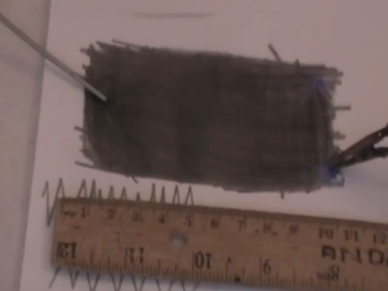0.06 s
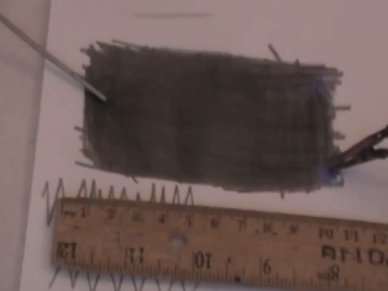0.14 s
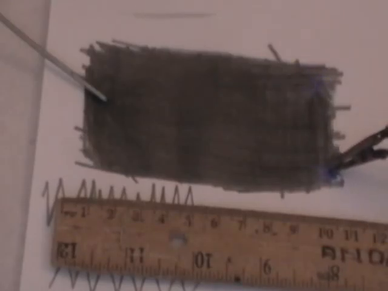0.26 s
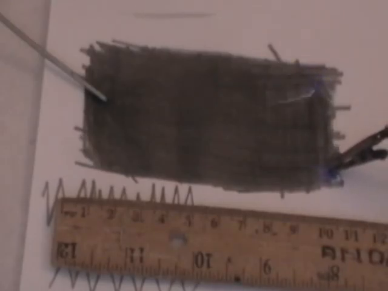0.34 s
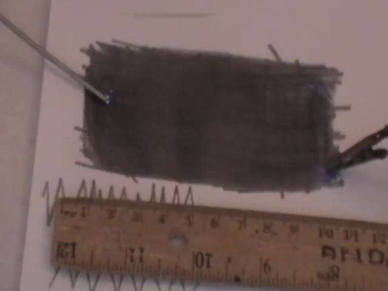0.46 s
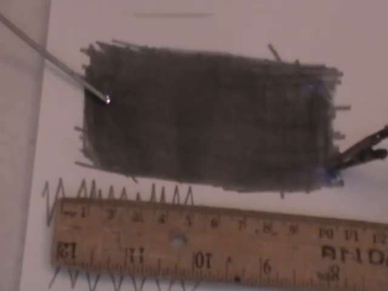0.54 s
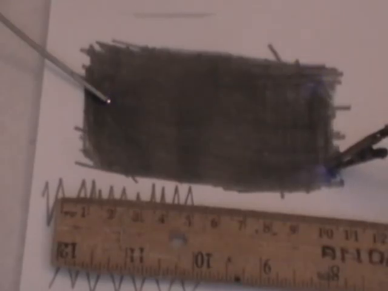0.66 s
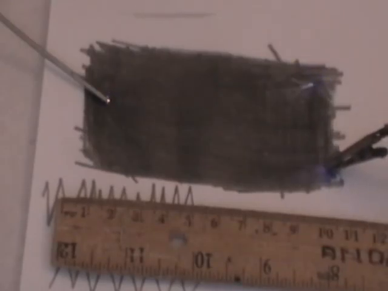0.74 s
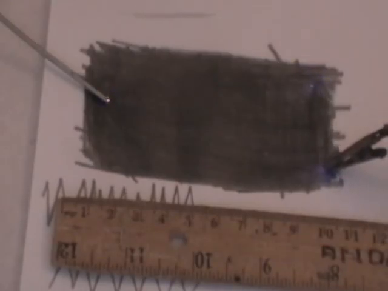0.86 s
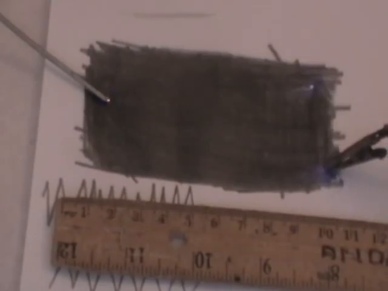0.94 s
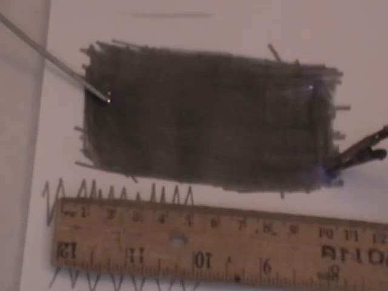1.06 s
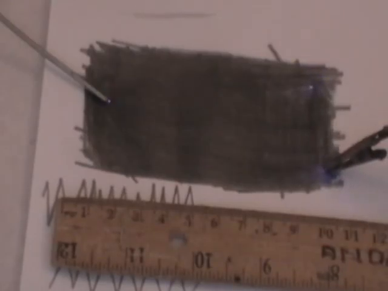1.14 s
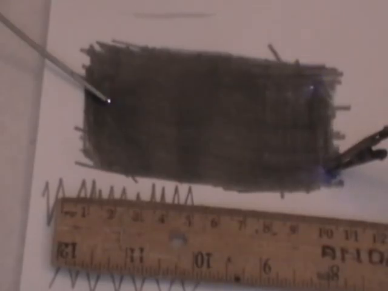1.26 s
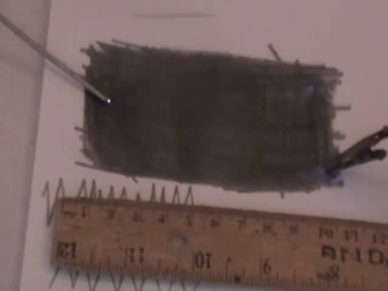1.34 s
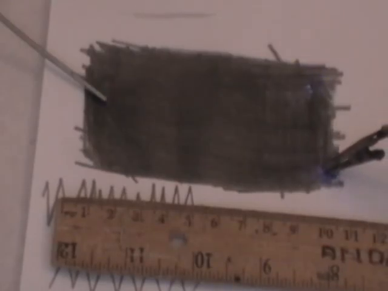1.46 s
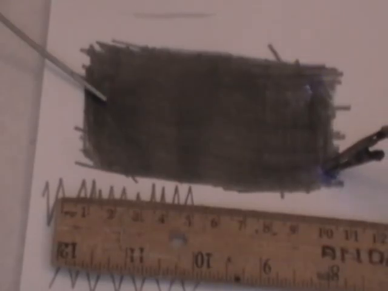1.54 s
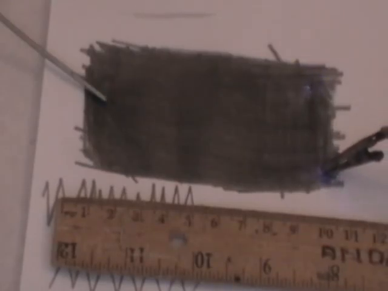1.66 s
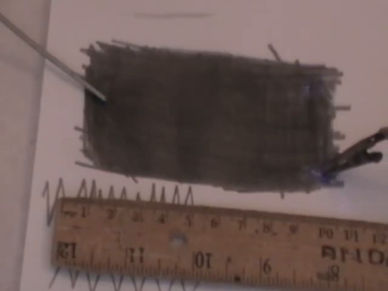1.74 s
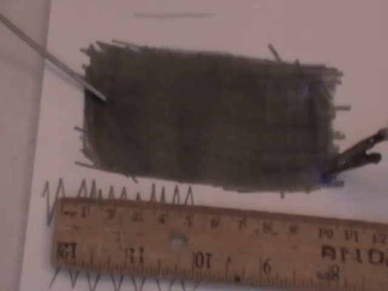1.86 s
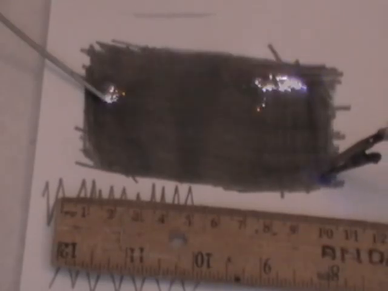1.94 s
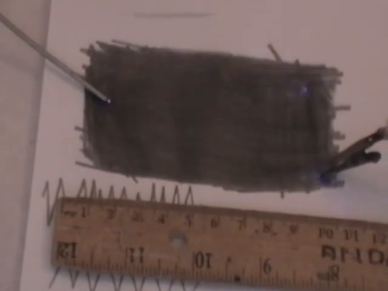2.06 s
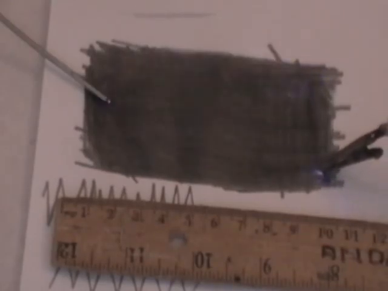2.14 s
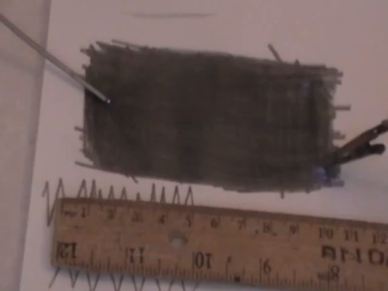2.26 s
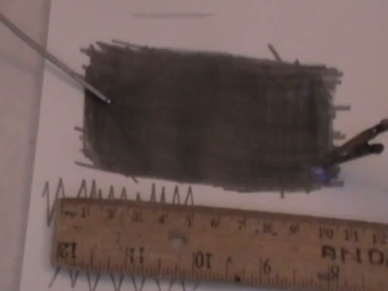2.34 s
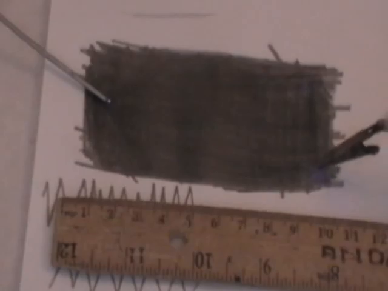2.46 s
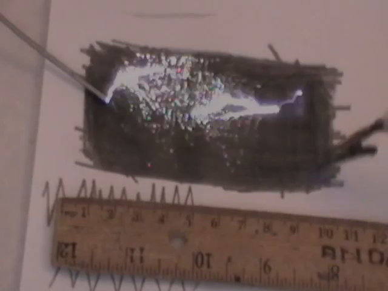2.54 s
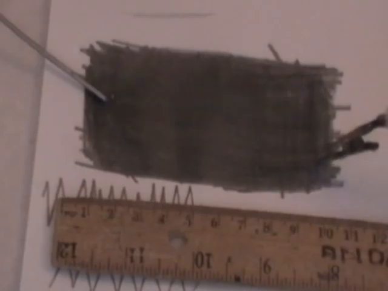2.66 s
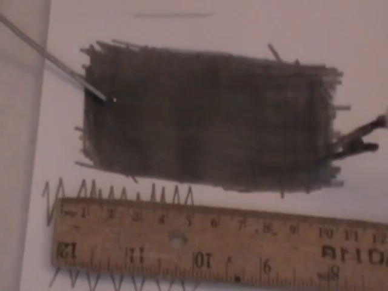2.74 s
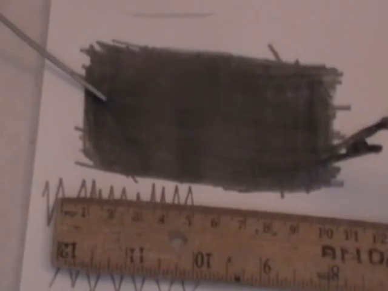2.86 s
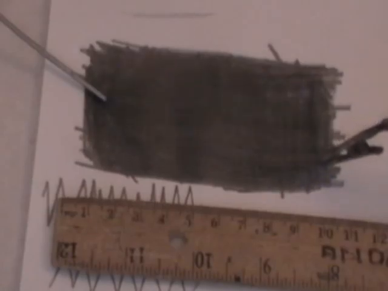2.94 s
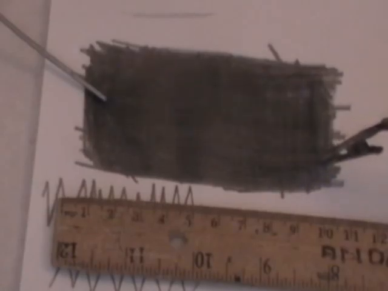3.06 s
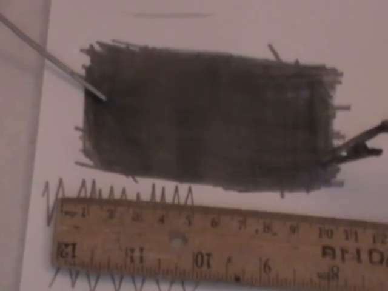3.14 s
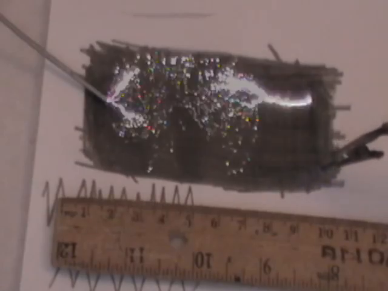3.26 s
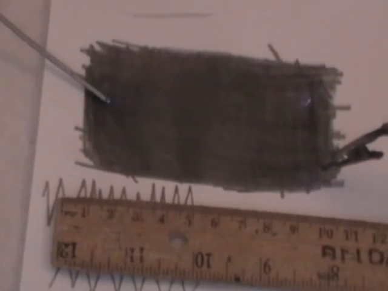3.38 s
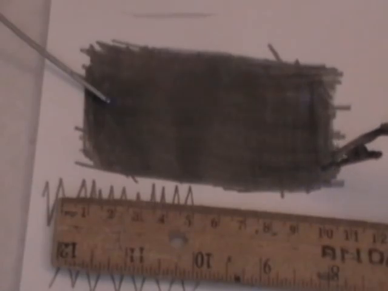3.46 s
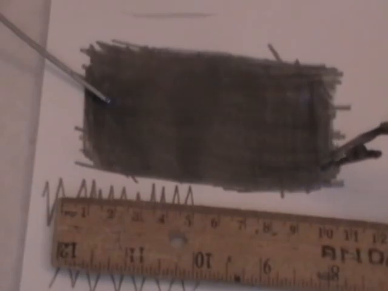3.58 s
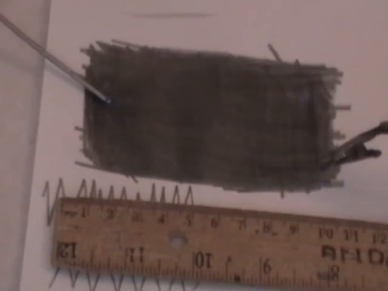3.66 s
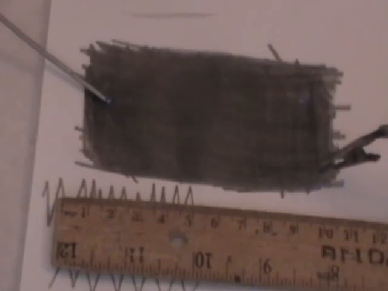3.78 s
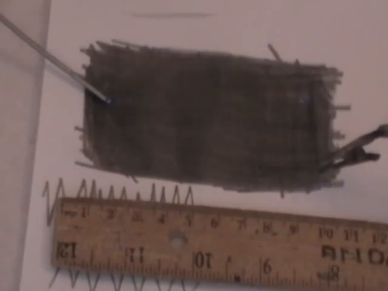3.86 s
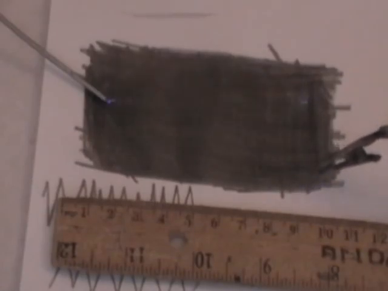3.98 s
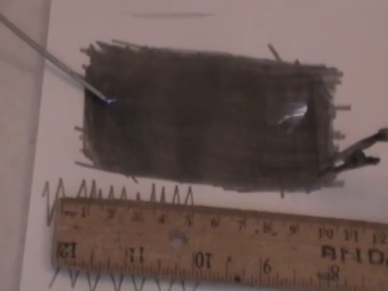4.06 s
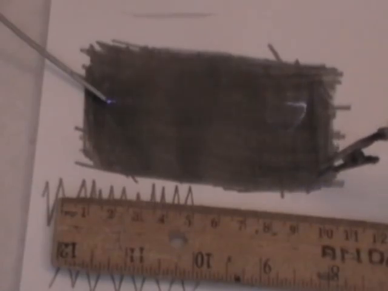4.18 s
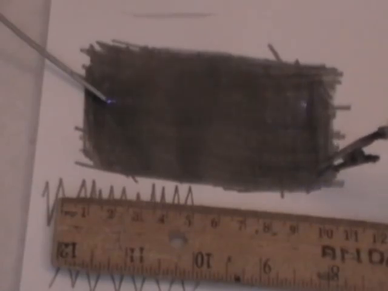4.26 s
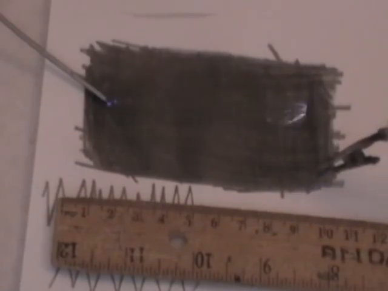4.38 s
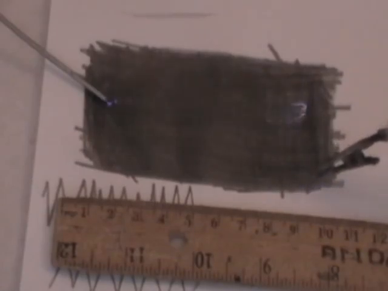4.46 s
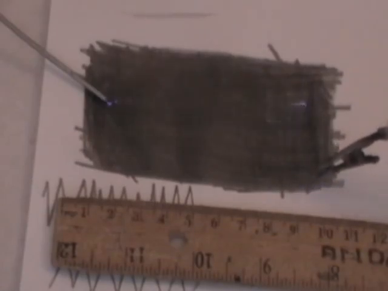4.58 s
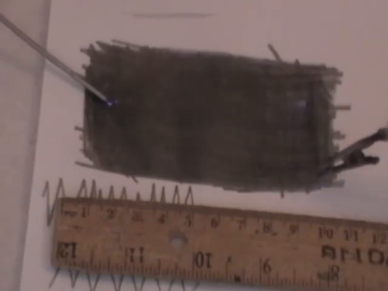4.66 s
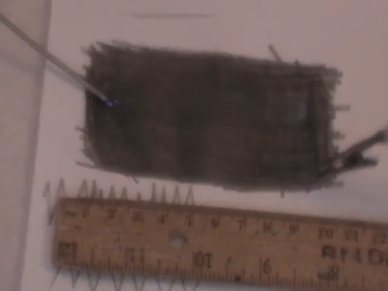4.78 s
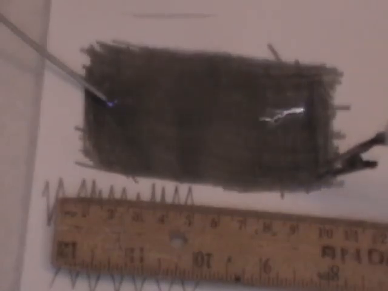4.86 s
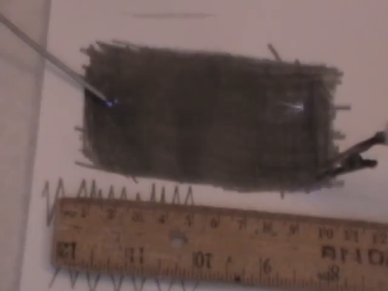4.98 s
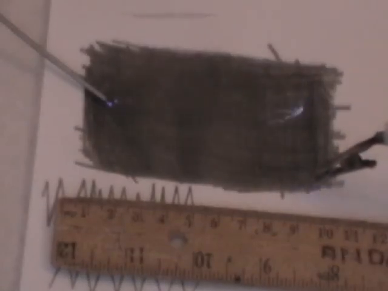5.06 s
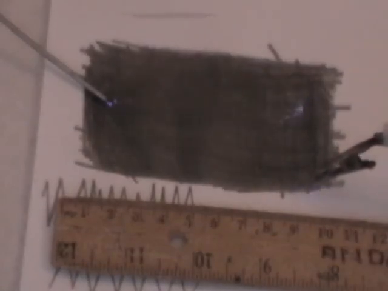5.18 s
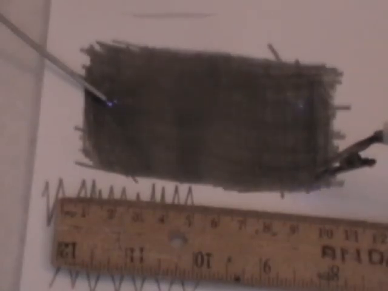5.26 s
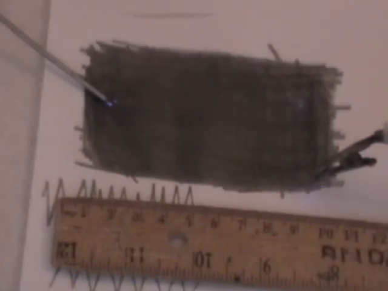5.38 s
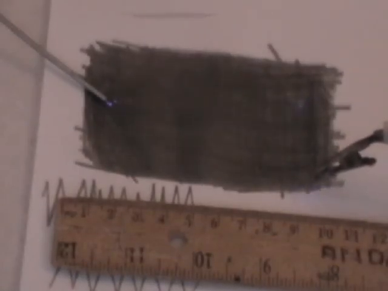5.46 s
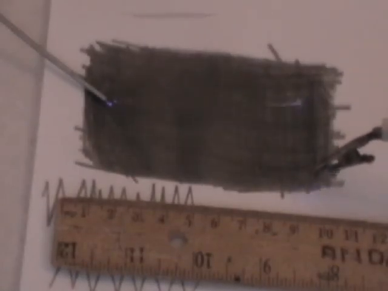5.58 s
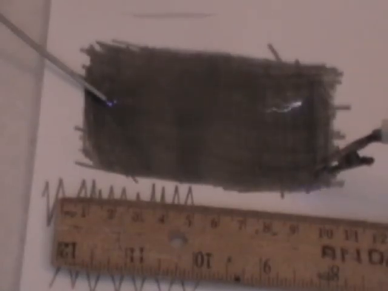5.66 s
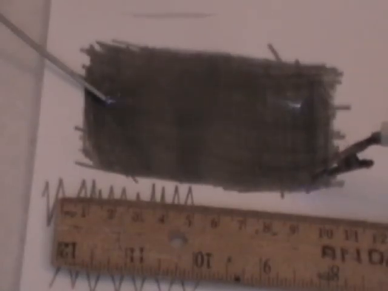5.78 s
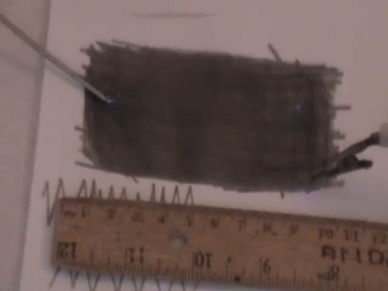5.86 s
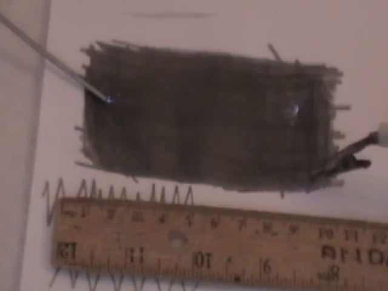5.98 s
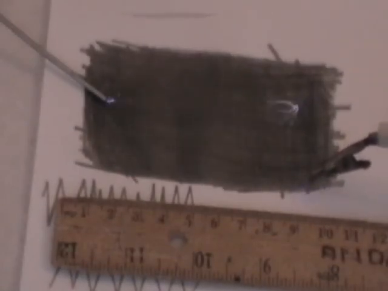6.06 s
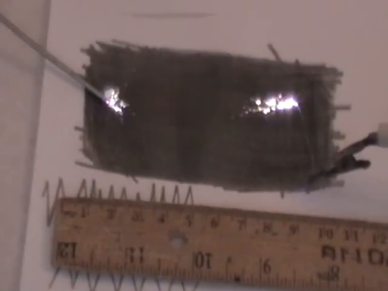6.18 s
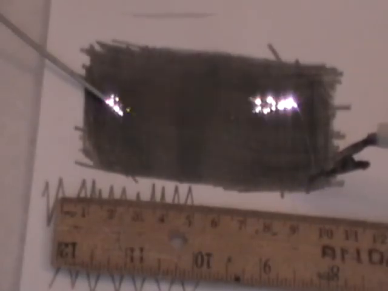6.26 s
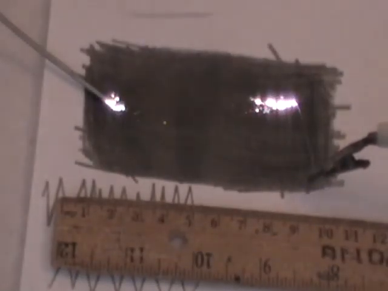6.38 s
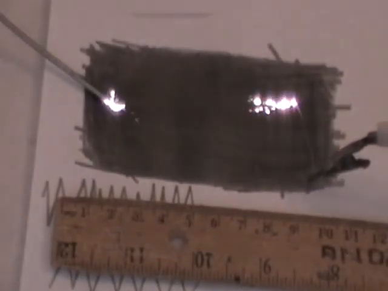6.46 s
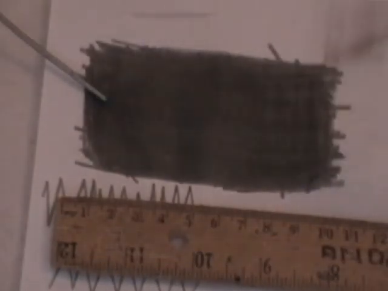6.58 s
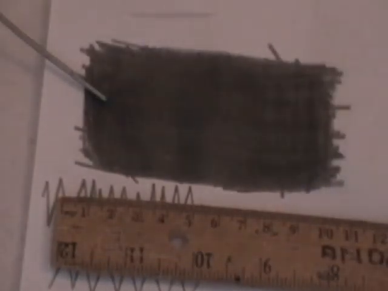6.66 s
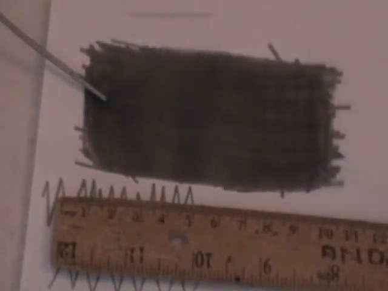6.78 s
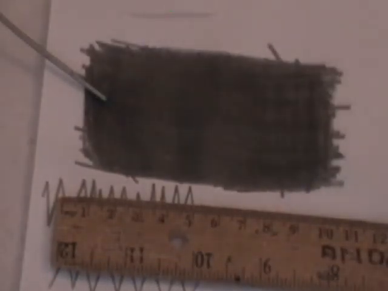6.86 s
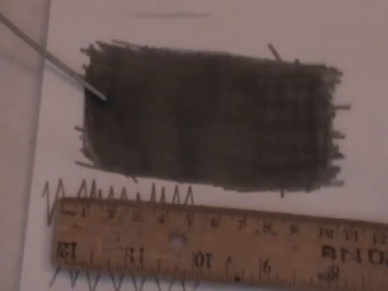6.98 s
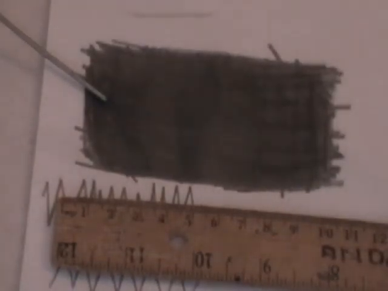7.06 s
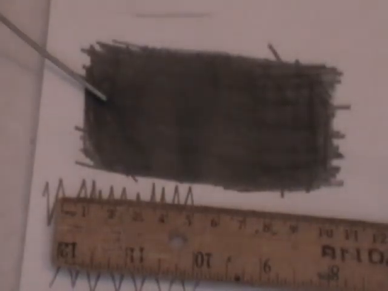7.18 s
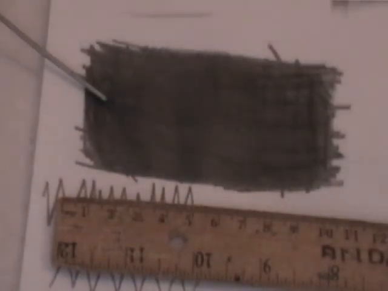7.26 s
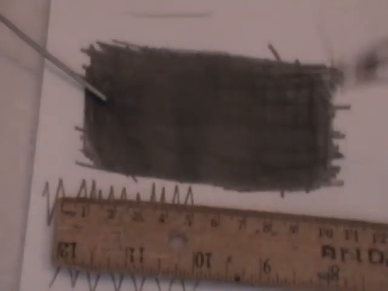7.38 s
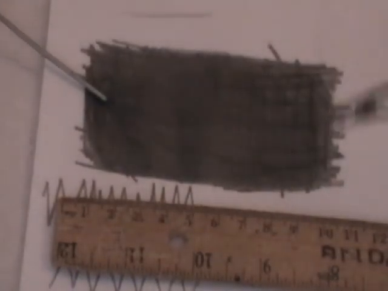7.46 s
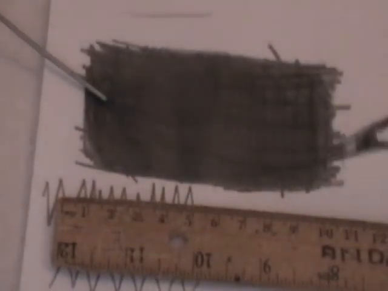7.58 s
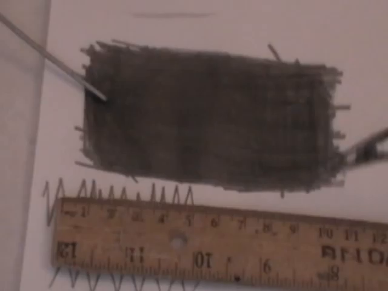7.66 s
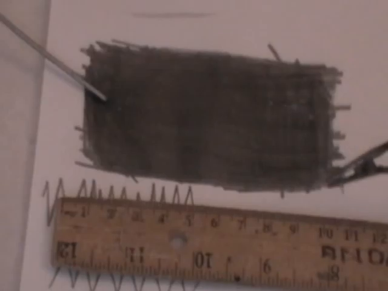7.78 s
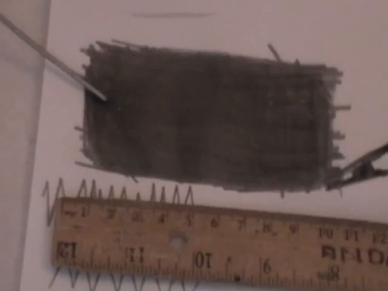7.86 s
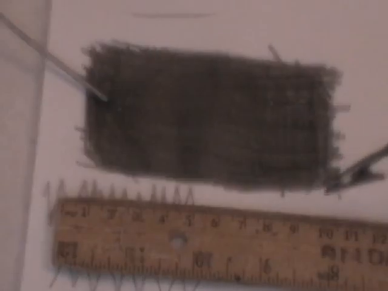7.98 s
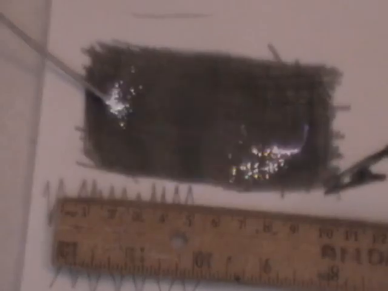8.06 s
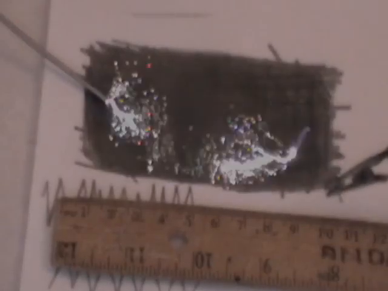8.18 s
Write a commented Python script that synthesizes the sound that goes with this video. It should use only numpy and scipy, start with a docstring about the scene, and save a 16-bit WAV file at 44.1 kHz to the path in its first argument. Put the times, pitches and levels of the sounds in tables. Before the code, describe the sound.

A harsh high electrical hiss sizzles and wavers close up, broken by five loud sharp spark snaps, over a faint transformer hum.

```python
"""In a small hard room, a high-voltage discharge creeps over a pencilled patch of paper near the microphone.
Corona is heard as shaped noise that flares and chokes, with faint whistles of narrow-band noise on top.
Now and then a spark jumps: a noise crack with echoes, a push of air and a decaying ring of the room, loud
enough to overload the microphone. Crackles and light desk taps are heard too. Underneath lie a
transformer hum of steady sines and a background of coloured noise."""
import sys
import numpy as np
from scipy import signal
from scipy.io import wavfile
from scipy.ndimage import uniform_filter1d

SR = 44100
rng = np.random.default_rng(int(sys.argv[2]) if len(sys.argv) > 2 else 0)


def voltage_ratio(decibels):
    """Convert decibels (scalar or array-like) to amplitude ratios, 20 dB per decade."""
    exponent = np.asarray(decibels, float) / 20
    return 10 ** exponent


def unload_wav(signal):
    """Save mono or channel-first audio to the path in sys.argv[1] as 16-bit WAV at rate SR, clipped to [-1, 1]."""
    wavfile.write(
        sys.argv[1],
        SR,
        np.round(np.clip(np.atleast_2d(signal).T, -1, 1) * 32767).astype(np.int16),
    )


N = 362502  # length in samples

# Strength of the discharge as the electrode moves. Each row: time in seconds, corona hiss in dB,
# fizz of sparks tracking over the graphite in dB re corona, top sizzle in dB re corona.
DISCHARGE = [(0, -35, -13.5, -11), (.33, -39, -11.5, -7.5), (.505, -39, -10.5, -9), (.53, -43.5, -10, -6),
             (.62, -39, -10, -6), (.95, -36, -12.5, -8.5), (1.3, -38.5, -10.5, -6.5),
             (1.57, -35.5, -14.5, -7.5), (2.02, -40.5, -8, -6.5), (2.25, -38.5, -9.5, -8.5),
             (2.65, -36, -5.5, -11.5), (2.85, -35, -7, -12.5), (3.38, -33.5, -9, -12.5),
             (3.55, -38, -8.5, -12), (3.85, -40.5, -6, -13), (4.45, -41, -7.5, -8),
             (4.46, -35.5, -10.5, -10), (4.75, -35, -9.5, -16), (4.95, -33, -11, -16),
             (5.3, -32, -10.5, -17), (5.58, -32.5, -10.5, -18), (5.81, -34, -7, -15), (5.86, -35.5, -9, -9),
             (6.05, -36.5, -10, -12.5), (6.26, -35, -9, -12), (6.5, -54, 1, -18), (6.64, -61, -9, -18),
             (6.7, -56.5, -11, -5), (7.05, -56, -8, -9), (7.6, -53, -10, -8.5), (7.8, -45.5, -11, -11),
             (7.92, -44, -6.5, -7), (8.15, -38, -4, -7.5)]
# Spectra of the three parts of the hiss. Each row: frequency in Hz, relative density in dB per Hz.
CORONA_SPECTRUM = [(3000, -48.5), (5500, -17), (6500, -4.5), (7500, -0.5), (8800, -2), (9600, -5.5),
                   (10500, -6.5), (11500, -17.5), (14000, -39)]
TRACKING_SPECTRUM = [(500, -38), (1000, -13), (2200, -8), (3000, -7), (3800, 0), (5000, -0.5), (5800, -1),
                     (7500, -9)]
SIZZLE_SPECTRUM = [(9000, -12.5), (11500, 1.5), (12500, -0.5), (14000, -3), (15600, -3.5), (17000, -28)]
# Swells of the corona, or dips where negative. Each row: start in seconds, level change in dB.
FLARES = [(.06, 2.5), (.22, 1), (.74, 0.5), (1.06, 0.5), (1.65, -2), (1.93, 3.5), (2.53, -2.5), (3.61, 2),
          (3.9, 2), (4.0, 2), (4.15, 1.5), (4.3, 0.5), (4.395, 0.5), (4.49, 1), (6.17, 0.5), (6.74, 2.5),
          (7.84, 2.5), (7.905, 4)]
FLARE_RISE_S, FLARE_FALL_S = 0.012, 0.043
# The discharge chokes for a moment and strikes again. Each row: start in seconds, length in seconds,
# loss in dB.
BREAKS = [(3.03, .014, 4), (3.108, .016, 7), (3.145, .014, 5), (3.58, .028, 4), (7.805, .047, 9),
          (7.86, .011, 9), (7.8745, .0045, 8), (7.889, .011, 9), (7.903, .013, 10), (7.974, .005, 6),
          (7.996, .008, 5)]
SPUTTER_DB, SPUTTER_S = 0.45, 0.03
# Single discharges that stand out of the hiss: rate, mean size before capping, decay time.
PRICKS_PER_S, PRICK_DB, PRICK_MS = 18, 1, 0.4

# Streamers that repeat almost evenly and whistle on one pitch. Each row: start in seconds,
# length in seconds, pitch in Hz, resonance width in Hz, level in dB before flutter and waver.
HELD_WHISTLES = [(0.042, .14, 10400, 900, -44), (.9, .1, 10300, 900, -39), (1.22, 0.32, 1220, 30, -61.5),
                 (2.4, .13, 3940, 500, -52), (3.14, 0.19, 3200, 300, -50), (4.435, 0.13, 5750, 1500, -44),
                 (6.654, 0.1, 6200, 1100, -54), (.82, .1, 12000, 1000, -47)]
HELD_FADE_S, HELD_WAVER_DB = 0.037, 0.5
# Streamers whose pitch moves as the gap changes. Each row: resonance width in Hz, then a list of points:
# time in seconds, pitch in Hz, level in dB before flutter.
WANDERING_WHISTLES = [(1100, [(.17, 15300, -58), (.21, 14600, -46), (.255, 11600, -52), (.31, 11900, -43),
                      (.37, 13800, -58), (.42, 12000, -46), (.47, 11200, -62), (.555, 12500, -49),
                      (.6, 11900, -58), (.67, 12200, -46), (.74, 11800, -62)]), (550, [(2.2, 8740, -52),
                      (2.255, 7200, -35), (2.35, 8150, -47), (2.42, 9400, -38), (2.475, 7700, -41),
                      (2.52, 10100, -39), (2.55, 8600, -36), (2.62, 5500, -50)]), (260, [(2.9, 3400, -62),
                      (3.0, 3610, -47), (3.09, 3600, -49), (3.13, 3500, -56), (3.21, 3750, -48),
                      (3.27, 3600, -60)]), (400, [(4.455, 4530, -51), (4.7, 4500, -57), (5.1, 4550, -48),
                      (5.4, 4540, -49), (5.86, 4420, -54)]), (330, [(4.455, 5090, -50), (4.9, 5030, -52),
                      (5.06, 5020, -42), (5.2, 5050, -48), (5.4, 5090, -45), (5.6, 5040, -50),
                      (5.78, 5050, -45), (5.92, 5000, -62)]), (250, [(6.725, 5900, -70), (6.742, 4600, -58),
                      (6.755, 3300, -58), (6.78, 2200, -74)]), (300, [(6.71, 6900, -62), (6.78, 7750, -55),
                      (7.2, 7750, -55), (7.55, 7650, -56), (7.7, 7450, -60)]), (330, [(7.275, 2100, -68),
                      (7.315, 3200, -62), (7.345, 4100, -56), (7.385, 4800, -60), (7.41, 5000, -74)]),
                      (900, [(7.41, 5100, -70), (7.5, 6000, -57), (7.6, 6600, -57), (7.68, 6900, -66)]),
                      (700, [(7.3, 6500, -72), (7.36, 8850, -63), (7.45, 10200, -63), (7.62, 12500, -66)]),
                      (1000, [(7.47, 5000, -70), (7.58, 4400, -59), (7.68, 3900, -62), (7.75, 3500, -68)])]

# Big sparks. Each row: start in seconds, crack in dB, crack length in ms, low pressure push in dB,
# room tail in dB, dullness from 0 to 1.
SPARKS = [(2.037, 0, 0.64, 3.5, -9.5, 0.1), (2.6626, -2, 3, -33, -13, 0.33),
          (3.4032, 0.5, 1.4, -22.5, -20, 1), (6.267, 4.5, 0.32, 0.5, -9, 0.05),
          (8.1632, 1, 4.8, -6.5, -11, 0.06)]
# Spectrum of a thin fast spark. Each row: frequency in Hz, relative density in dB per Hz.
BRIGHT_SPECTRUM = [(88, -67), (150, -39), (398, -17.5), (1290, -10.5), (1450, -7), (2650, -6), (3700, -2),
                   (4670, -2.5), (8230, 2), (14800, -9), (16000, -33)]
# Spectrum of a fat slow spark. Each row: frequency in Hz, relative density in dB per Hz.
DULL_SPECTRUM = [(100, -40), (200, -27), (400, -14), (800, -8), (1500, -1), (2500, 0), (3800, -4),
                 (6000, -12), (9000, -22), (12000, -33), (16000, -46)]
# Reflections from the nearest surfaces. Each row: delay in ms, level in dB re the direct crack.
ECHOES = [(2.1, -6), (6.7, -5), (9.5, -12)]
# Reverberation time of the room. Each row: frequency in Hz, decay time in seconds.
ROOM_T60 = [(200, 0.17), (500, 0.39), (1500, 0.3), (4000, 0.28), (8000, 0.22), (13000, 0.15)]
# Small crackles without a push. Each row: start in seconds, level in dB before the stutter, length in ms,
# dullness from 0 to 1.
CRACKLES = [(0.5076, -26.5, 3.4, 0.5), (.68, -45, 6, .9), (.78, -39, 1.5, .4), (.82, -44, 4, 1),
            (1.655, -38, 4, 0.36), (4.395, -47, 8, 0.1), (6.647, -44.5, 6.8, 1), (7.051, -49.5, 2.9, 0),
            (7.719, -49, 6.4, 0), (7.76, -48, 4.1, 0.5), (7.782, -47.5, 31, 0.2), (7.852, -44.5, 7, 0.6),
            (7.871, -42, 2.3, 0.5), (7.879, -45, 3, 0.7), (7.9183, -37, 2, 0.5), (7.93, -36.5, 3, 0.8),
            (7.958, -46, 3, .6), (7.991, -46, 3.8, .1)]
CRACKLE_TAIL_DB = -21.5  # re the crackle itself
CRACKLE_RAG_DB, CRACKLE_RAG_S = 2.5, 0.0015  # uneven stutter

# Modes of the wooden top under the paper. Each row: frequency in Hz, relative level in dB, T60 in seconds.
DESK_MODES = [(433, -11, .15), (610, -7, .2), (667, 0, 0.17), (747, -3, 0.16), (846, -1, 0.076),
              (1100, -4, 0.11), (1490, 0, 0.076), (1590, 1, 0.073)]
# The electrode touches down. Each row: start in seconds, peak in dB before the stereo balance.
TAPS = [(.509, -26.5), (6.648, -47), (7.919, -42)]

# Partials of the hum. Each row: multiple of twice the mains frequency, rms level in dB before the balance.
HUM_PARTIALS = [(1, -58.5), (2, -68.5), (3, -63)]
HUM_HZ = 99.97  # twice the mains frequency
# Spectrum of air, fans and microphone noise. Each row: frequency in Hz, relative density in dB per Hz.
ROOM_NOISE_SPECTRUM = [(25, -30.5), (45, -1.5), (75, -20), (120, -11.5), (165, -3), (188, 8), (215, -13.5),
                       (250, -8.5), (370, -3.5), (600, -9.5), (1200, -8.5), (2100, -13.5), (4800, -16),
                       (9000, -19), (15000, -28.5)]
ROOM_NOISE_DB = -56

# Left-right correlation of hiss, sparks and background. Each row: frequency in Hz, correlation from 0 to 1.
HISS_CORRELATION = [(300, 0.96), (3100, 0.95), (6800, 0.99), (10000, 0.99), (11500, 0.79), (15000, .8)]
SPARK_CORRELATION = [(300, 1), (1000, 0.99), (3100, 0.93), (6800, 0.97), (9500, 0.95), (12000, 0.24),
                     (15000, 0.27)]
ROOM_CORRELATION = [(60, 1), (300, 0.93), (640, 0.2), (1400, 0.86), (3000, 0.5), (6000, .9), (11000, .8),
                    (15000, 0.7)]
LOW_CUT_HZ, HIGH_CUT_HZ = 52, 15800


def evened(x):
    """Normalises a quantity to an rms value of 1."""
    return x / np.sqrt(np.mean(x ** 2) + 1e-20)


def read(points, hz):
    """Interpolates a spectrum linearly along a logarithmic frequency axis."""
    f, value = np.transpose(points)
    return np.interp(np.log(hz + 1), np.log(f + 1), value)


def add(mix, s, sound):
    """Superposes a stereo sound on the mix from s seconds on."""
    part = mix[:, round(s * SR):][:, :sound.shape[1]]
    part += sound[:, :part.shape[1]]


def chance(seconds, count):
    """Averages white noise over the given time into a random curve of rms 1."""
    return evened(uniform_filter1d(rng.standard_normal(count), max(round(seconds * SR), 1)))


def patches(hz, t, wide, long):
    """Averages a random time-frequency field over wide bins and long frames, to rms 1."""
    field = rng.standard_normal((len(t), len(hz))).T
    smooth = uniform_filter1d(field, wide, 0)
    return evened(uniform_filter1d(smooth, long, 1))


def noise(gain, correlation, count, size):
    """Shapes random short-time spectra by gain(hz, t); the share of mid and side sets the correlation."""
    frames = 4 * count // size + 5
    hz = np.fft.rfftfreq(size, 1 / SR)[:, None]
    t = np.arange(frames) * size / 4 / SR
    a, b, c, d = rng.standard_normal((frames, len(hz), 4)).T
    same = np.clip(read(correlation, hz), 0, 1)
    mid = np.sqrt((1 + same) / 2) * (a + 1j * b)
    side = np.sqrt((1 - same) / 2) * (c + 1j * d)
    spectra = np.array([mid + side, mid - side]) * gain(hz, t)
    return signal.istft(spectra, nperseg=size, noverlap=3 * size // 4)[1][:, :count]


def strength(t):
    """The corona level in dB is a slow curve plus brief flares, less the losses while the arc chokes."""
    s, db, *_ = np.transpose(DISCHARGE)
    level_db = np.interp(t, s, db)
    for start, up_db in FLARES:
        after = t - start
        rise = np.clip(after / FLARE_RISE_S, 0, 1)
        fall = np.exp(-(np.maximum(after - FLARE_RISE_S, 0) / FLARE_FALL_S) ** 2)
        level_db = level_db + up_db * rise * fall
    for start, length, lost_db in BREAKS:
        u = (t - start) / length
        level_db = level_db - lost_db * np.clip(4 * u, 0, 1) * (u < 1)  # gradual loss, sudden return
    return level_db


def hiss():
    """Countless tiny discharges add up to noise: three bands with lasting ripples, drift and flicker."""
    s, _, tracking_db, sizzle_db = np.transpose(DISCHARGE)
    parts = ((CORONA_SPECTRUM, 0 * s), (TRACKING_SPECTRUM, tracking_db), (SIZZLE_SPECTRUM, sizzle_db))

    def gain(hz, t):
        """Adds the powers of the three bands and modulates their sum."""
        power = 0
        for spectrum, share_db in parts:
            shape = evened(voltage_ratio(read(spectrum, hz)))
            power = power + (shape * voltage_ratio(np.interp(t, s, share_db))) ** 2
        # nearby reflections comb the hiss while the arc stays put
        ripples_db = 1.97 * patches(hz, t, wide=2, long=130)
        drift_db = 0.8 * patches(hz, t, wide=20, long=16)
        return np.sqrt(power) * voltage_ratio(ripples_db + drift_db)

    flat_rms = np.std(noise(lambda hz, t: 1, HISS_CORRELATION, count=8192, size=1024))
    level_db = strength(np.arange(N) / SR) + SPUTTER_DB * chance(SPUTTER_S, N)
    struck = rng.random(N) < PRICKS_PER_S / SR
    sizes_db = PRICK_DB * np.minimum(rng.exponential(1, N), 3) * struck
    decay = np.exp(-1000 / (PRICK_MS * SR))
    level_db = level_db + signal.lfilter([1], [1, -decay], sizes_db)
    return voltage_ratio(level_db) * noise(gain, HISS_CORRELATION, count=N, size=1024) / flat_rms


def whistle(hz, db, width):
    """Resonated noise modulates a carrier, giving a narrow band that follows a frequency curve."""
    r = np.exp(-np.pi * width / SR)
    excitation = rng.standard_normal((len(hz) + 4000, 2)) @ [1, 1j]
    wobble = signal.lfilter([1], [1, -2 * r, r * r], excitation)[4000:]  # without the onset of the filter
    carrier = np.exp(2j * np.pi * np.cumsum(hz) / SR)
    flutter_db = 2.0 * chance(0.02, len(hz))  # the streamer sputters
    tone = voltage_ratio(flutter_db) * evened((wobble * carrier).real)
    tone = voltage_ratio(db) * tone * signal.windows.tukey(len(hz), 400 / len(hz))
    return np.tile(tone, (2, 1))


def held(start, length, hz, width, db):
    """Almost even repetition holds one pitch, which fades in, wavers in strength and fades out."""
    count = round(length * SR)
    sound = whistle(np.full(count, hz), db + HELD_WAVER_DB * chance(0.13, count), width)
    return start, sound * signal.windows.tukey(count, np.clip(2 * HELD_FADE_S / length, 0, 1))


def wandering(width, points):
    """The repetition rate moves with the gap, so that the whistle glides along its pitch curve."""
    s, hz, db = np.transpose(points)
    t = np.arange(s[0], s[-1], 1 / SR)
    return s[0], whistle(np.interp(t, s, hz), np.interp(t, s, db), width)


def blast(ms, length_ms):
    """Pressure of a small explosion: a jump, a slide through zero and a shallow suction."""
    u = np.maximum(ms, 0) / length_ms
    onset = 1 - np.exp(-np.maximum(ms, 0) / 0.067)
    return (1 - u) * np.exp(-u) * onset


def spark(s, crack_db, crack_ms, push_db, tail_db, dull):
    """Sudden heating of the gap yields a ragged crack with echoes, a push of air and reverberation."""
    count, dull = SR // 2, np.clip(dull, 0, 1)
    ms = 1000 * np.arange(count) / SR

    def colour_db(hz, share):
        """Mixes the thin and the fat spark spectrum."""
        return (1 - share) * read(BRIGHT_SPECTRUM, hz) + share * read(DULL_SPECTRUM, hz)

    def burst(after, length):
        """Pulse envelope in ms, falling less squarely for dull sparks."""
        return np.clip(after / 0.19, 0, 1) * np.exp(-np.abs(after / length) ** (3.5 - 2.7 * dull))

    # the direct crack is brighter than its ring in the room
    rag = evened(noise(lambda hz, t: voltage_ratio(colour_db(hz, 0.78 * dull)), SPARK_CORRELATION, count=count, size=256))
    echoes = sum(voltage_ratio(db) * burst(ms - late, length=1.66) for late, db in ECHOES)
    crack = rag * (burst(ms, crack_ms) + echoes)

    # an inverted reflection of the push arrives about 2 ms later, and the two microphone ports settle at
    # slightly different speeds
    reflection = np.array([blast(ms - 2.1, length_ms=1.6), blast(ms - 2.25, length_ms=1.8)])
    push = blast(ms, length_ms=1.7) - 1.8 * reflection

    # the decay starts slowly and then steepens, most of all after thin sparks
    knee = 0.055 - 0.015 * dull

    def tail_gain(hz, t):
        """Spectrum of the spark, decaying with the reverberation time."""
        fall_db = -60 * (np.hypot(t, knee) - knee) / read(ROOM_T60, hz)
        return voltage_ratio(colour_db(hz, dull) + fall_db)

    tail = noise(tail_gain, SPARK_CORRELATION, count=count, size=256)
    tail = tail / np.std(tail[:, :2000]) * (1 - np.exp(-ms / 0.68))
    # a strong push pins the microphone, which lets the tail through only as it recovers
    pinned = np.clip(0.75 * voltage_ratio(push_db), 0, 0.9) * np.exp(-(ms / 9.5) ** 4)
    return s, voltage_ratio(crack_db) * crack + voltage_ratio(push_db) * push + voltage_ratio(tail_db) * (1 - pinned) * tail


def crackle(s, db, length_ms, dull):
    """A tiny spark displaces no air: it stutters, and its tail keeps a fixed level below the crack."""
    sound = spark(s, db, length_ms, -np.inf, db + CRACKLE_TAIL_DB, dull)[1]
    return s, sound * voltage_ratio(CRACKLE_RAG_DB * chance(CRACKLE_RAG_S, sound.shape[1]))


def tap(s, db):
    """A light knock excites the desk modes, which decay exponentially; it lies a little to the left."""
    t = np.arange(SR // 4) / SR
    ring = sum(voltage_ratio(level_db - 60 * t / t60) * np.sin(2 * np.pi * hz * t) for hz, level_db, t60 in DESK_MODES)
    balance = voltage_ratio(np.array([[1.5], [-1.5]]))
    return s, voltage_ratio(db) * ring / abs(ring).max() * balance


def hum():
    """The transformer core buzzes at multiples of twice the mains frequency, a little nearer the right."""
    t = np.arange(N) / SR
    tone = 0
    for multiple, db in HUM_PARTIALS:
        phase = 2 * np.pi * (multiple * HUM_HZ * t + rng.random())
        tone = tone + voltage_ratio(db) * np.sqrt(2) * np.sin(phase)
    return tone * voltage_ratio(np.array([[-0.8], [0.8]]))


def room():
    """Air, fans and the microphone superpose to steady coloured noise with slow spectral patches."""
    def gain(hz, t):
        return voltage_ratio(read(ROOM_NOISE_SPECTRUM, hz) + 1.3 * patches(hz, t, wide=6, long=12))

    return voltage_ratio(ROOM_NOISE_DB) * evened(noise(gain, ROOM_CORRELATION, count=N, size=2048))


def scene():
    """Linear superposition: hiss, hum and background, then whistles, sparks, crackles and taps."""
    mix = hiss() + hum() + room()
    events = ((held, HELD_WHISTLES), (wandering, WANDERING_WHISTLES), (spark, SPARKS),
              (crackle, CRACKLES), (tap, TAPS))
    for source, table in events:
        for row in table:
            add(mix, *source(*row))
    return mix


def roll_off(x):
    """The treble ends steeply here."""
    return signal.sosfilt(signal.butter(12, 16450, fs=SR, output="sos"), x)


def record(dry):
    """An overloaded microphone clips the peaks; filters then limit the band at both ends."""
    overloaded = np.clip(dry, -0.95, 0.95)
    heard = signal.lfilter(*signal.butter(2, LOW_CUT_HZ, "high", fs=SR), overloaded)
    low_pass = signal.firwin(1023, HIGH_CUT_HZ, window=("kaiser", 6), fs=SR)
    finished = signal.oaconvolve(np.clip(heard, -1, 1), low_pass[None], "same", axes=1)
    return roll_off(finished)


dry = scene()
out = record(dry)
unload_wav(out)
```